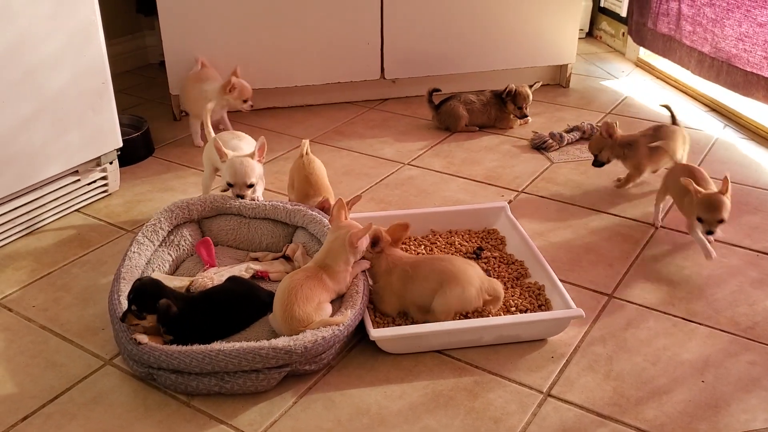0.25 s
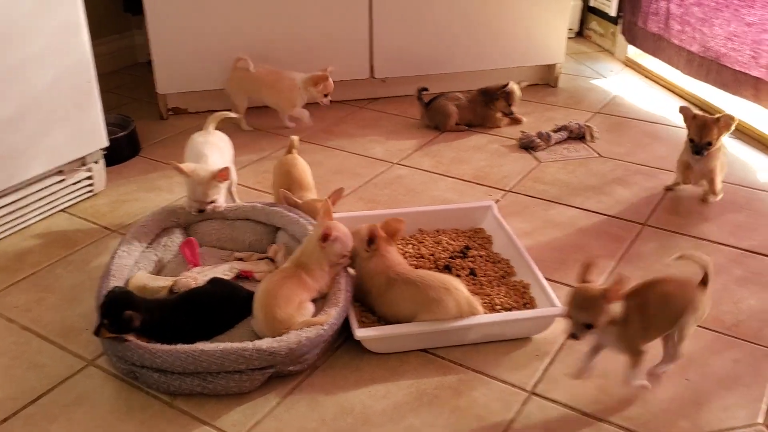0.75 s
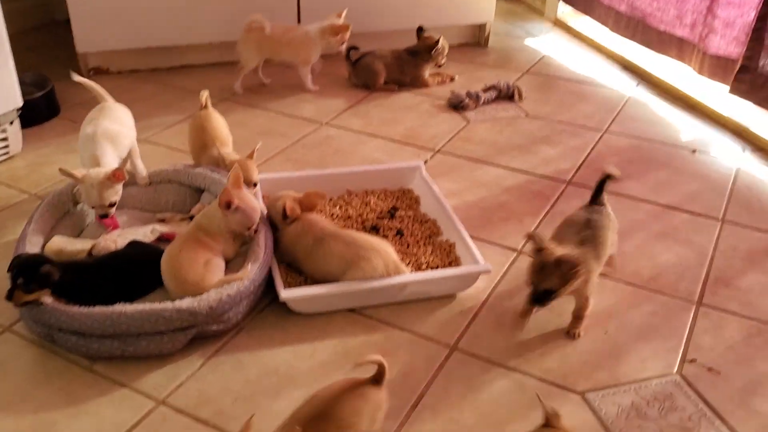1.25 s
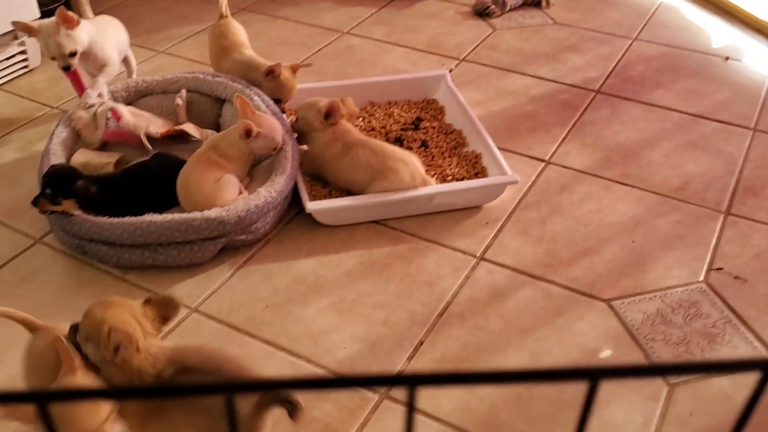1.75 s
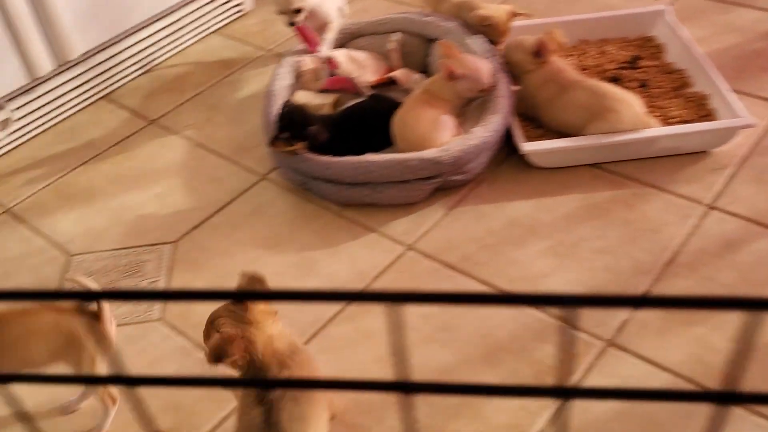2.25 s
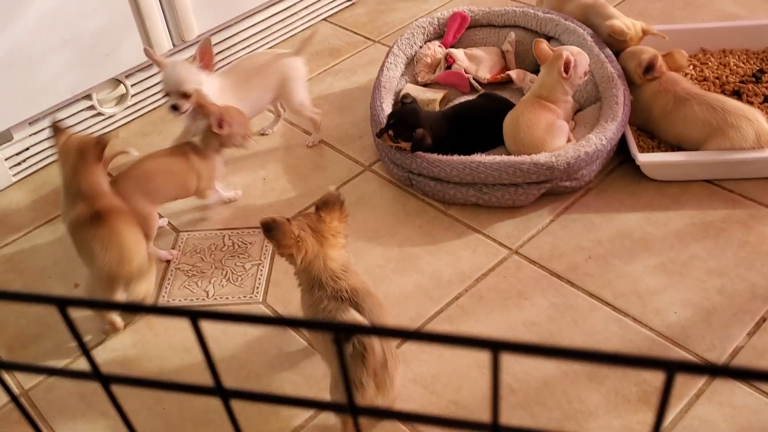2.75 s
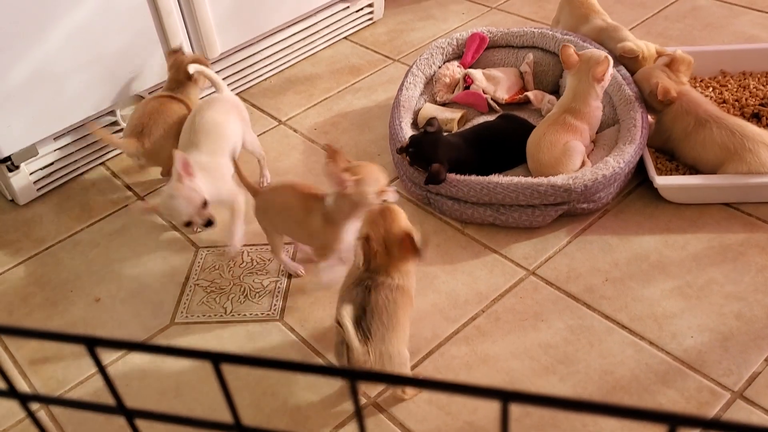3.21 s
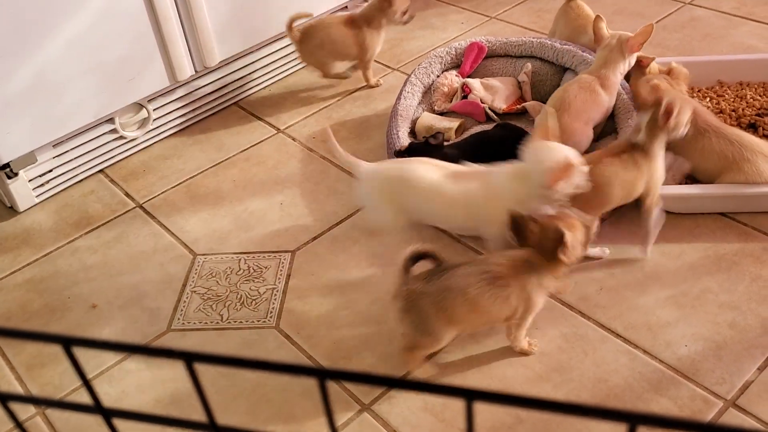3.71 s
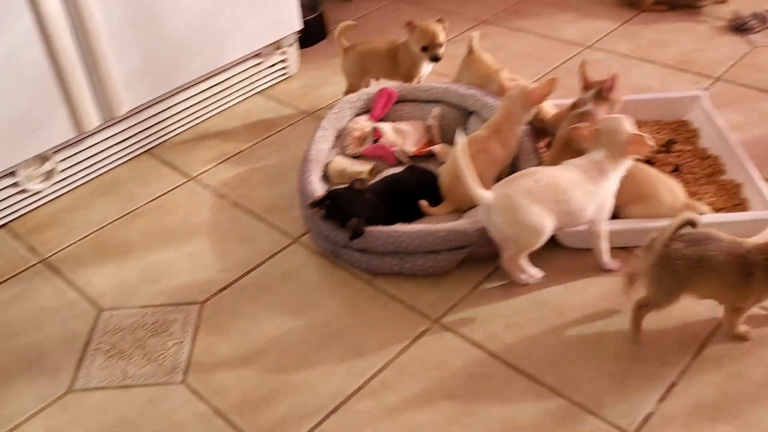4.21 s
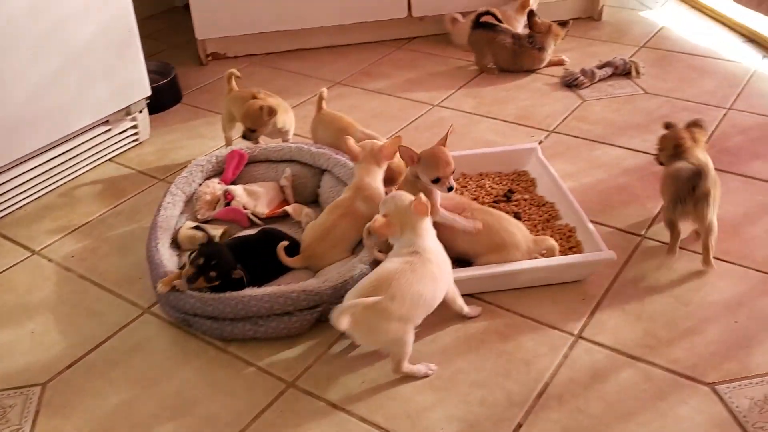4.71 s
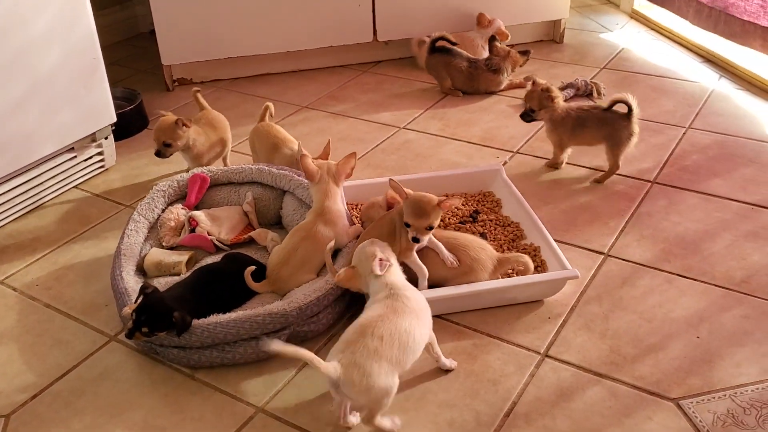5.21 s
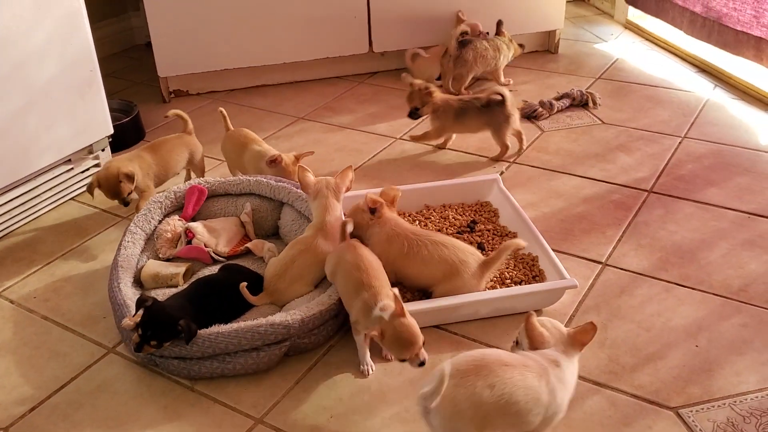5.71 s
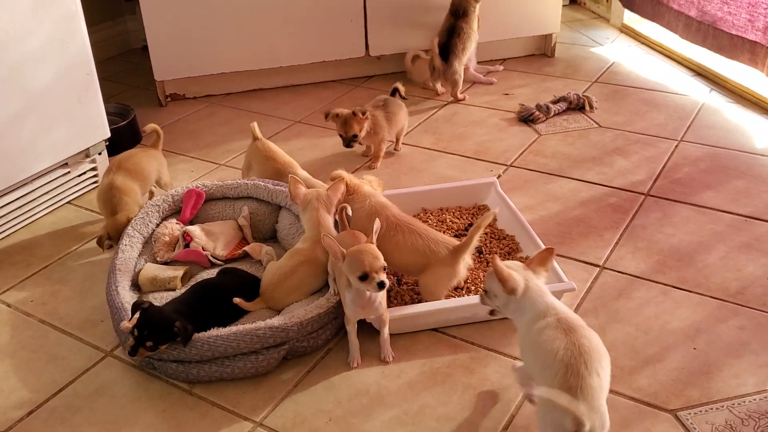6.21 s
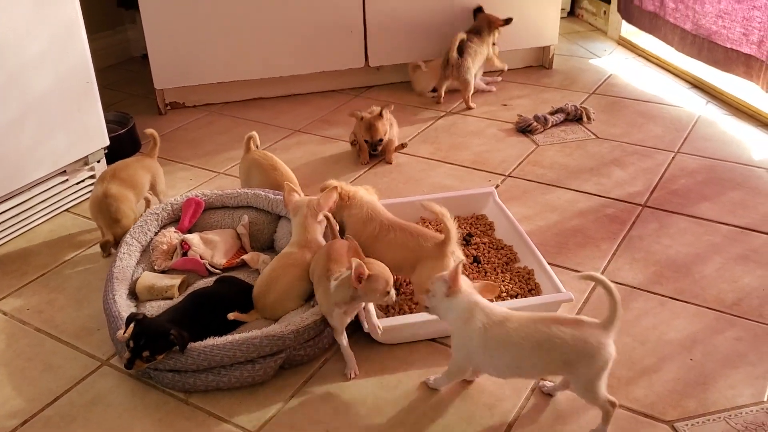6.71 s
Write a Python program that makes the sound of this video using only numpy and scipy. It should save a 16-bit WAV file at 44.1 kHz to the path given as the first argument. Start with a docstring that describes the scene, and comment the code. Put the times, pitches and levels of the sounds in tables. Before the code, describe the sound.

Small puppies romp indoors, their claws clicking and paws scuffing on tile, with soft thuds over a faint refrigerator hum.

```python
"""A tiled kitchen with small puppies romping. Claws tick and skid on the tiles; paws scuff and stir
wood pellets (gritty friction noise), and a pad squeaks once by stick-slip. Knocks ring the modes of a
plastic litter tray, bumped cupboard doors thud at their own low pitches, and soft paws set the floor
booming. Behind it all: a refrigerator's wavering hum and the room's hush."""
import sys
import numpy as np
from scipy import signal
from scipy.fft import rfft, irfft, next_fast_len
from scipy.io import wavfile
from scipy.ndimage import uniform_filter1d

SR = 44100
rng = np.random.default_rng(int(sys.argv[2]) if len(sys.argv) > 2 else 0)


def master_out(mix):
    """Clip the mix to full scale and print it as 16-bit PCM to the path in sys.argv[1]."""
    frames = np.transpose(np.atleast_2d(mix))
    ceiling = np.clip(frames, -1, 1)
    pcm = np.round(ceiling * 32767).astype(np.int16)
    wavfile.write(sys.argv[1], SR, pcm)


N = 306488

# room decay: f/Hz, t60/s
ROOM_T60 = [(300, 0.12), (1300, 0.47), (3500, 0.35), (9000, 0.31), (15000, 0.16)]
# left-right likeness of noise: f/Hz, coherence (clipped to 0..1)
COHERENCE = [(60, 0.94), (180, 0.92), (550, 0.67), (1650, -0.24), (4970, -1.3), (15000, -0.03)]
# microphone response: f/Hz, gain/dB
MIC_RESPONSE = [(6800, -1.5), (8200, -7), (10000, -5), (13000, -5), (15400, -4.5)]
# channel balance: f/Hz, left minus right/dB
MIC_BALANCE = [(60, 0.5), (180, 0.5), (550, -0.5), (1650, 0.5), (4970, 0.5), (15000, 2)]

# noise spectra: f/Hz, relative density/dB
HUSH_SPECTRUM = [(15, -40), (25, -78.5), (58, -1), (90, 3), (226, -1.5), (313, -22), (483, -3.5),
                 (553, -15), (706, -6.5), (1550, -72), (3150, -58), (5570, -22.5), (9330, -45),
                 (15200, -39), (15900, -35), (17000, -22)]  # room
BOOM_SPECTRUM = [(25, 6), (45, 24.5), (70, 35.5), (100, 29.5), (140, -25)]  # floor
FOOT_SPECTRUM = [(80, -7.5), (130, 1.5), (250, 1.5), (420, -5), (700, -40)]  # soft paws
SCRAPE_SPECTRUM = [(710, -49), (1200, 2.5), (1620, 5.5), (1820, 1.5), (2130, 4), (2860, 2.5), (3660, 2.5),
                   (4240, 1.5), (6030, -8.5), (8500, -19), (11000, -58), (18700, -120)]  # paw friction
FIZZ_SPECTRUM = [(5000, 9.5), (6800, 17.5), (9000, 14.5), (12000, 15.5), (14500, 20.5), (15900, 22),
                 (17000, -9)]  # treble of near paws
WEIGHT_SPECTRUM = [(300, -32), (500, -3), (900, 3), (1400, -11), (2200, -26)]  # paws pressing on the floor

# refrigerator lines: f/Hz, width/Hz
HUM_LINES = [(120, 4.5), (213.5, 4.9)]
# their wavering: t/s, lower line level/dB, upper line level/dB
HUM_LEVELS = [(0.0, -60, -59), (0.8, -58.5, -55.5), (1.9, -59, -68.5), (2.2, -52.5, -65),
              (2.65, -51, -50.5), (3.15, -57.5, -62), (3.5, -49, -56.5), (3.85, -59.5, -57.5),
              (5.4, -75, -61.5), (6.3, -60, -58.5), (6.95, -53, -58)]
# tumbles on the floor: t/s, level/dB
TUMBLES = [(0, -41), (2.75, -49), (3.9, -48), (4.55, -55), (5.79, -42), (6.35, -46.5), (6.72, -39)]
# heavier soft steps: t/s, level/dB
STEPS = [(.02, -45), (.11, -42), (.43, -57), (.62, -49), (0.969, -51.5), (1.23, -52.5), (1.45, -47),
         (1.53, -45.5), (2.14, -48.5), (2.27, -50), (2.67, -45), (3.3, -45.5), (3.6, -49), (4.01, -40.5),
         (4.29, -50), (4.38, -53), (4.53, -47.5), (4.67, -54), (5.46, -49.5), (5.54, -45), (5.73, -37.5),
         (5.87, -52.5), (6.6, -48)]
# cupboard bumps: t/s, level/dB, f/Hz, t60/s, rise/ms
DOOR_BUMPS = [(0.087, -51, 166, 0.38, 11), (2.572, -40, 68.4, 0.57, 17), (4.017, -33, 73.2, 0.71, 30),
              (4.522, -42.5, 134, .15, 8), (5.627, -22, 92.2, 0.1, 17), (5.68, -27, 51.6, 0.51, 9.7),
              (5.701, -26, 92, 0.13, 19), (6.303, -34.5, 99, 0.092, 12), (6.352, -37, 50.7, 0.35, 13),
              (6.592, -19, 102.9, 0.19, 6.7), (6.593, -27, 165, 0.13, 3.5),
              (6.592, -43.5, 309.5, 0.21, 8.1), (6.643, -30.5, 52.9, 0.57, 38),
              (6.655, -23.5, 92.5, 0.29, 14)]
# tray modes: f/Hz, relative level/dB, t60/s
TRAY_MODES = [(900, -12, .025), (1075, -3, .05), (1368, 0, .06), (1590, -3, .04), (1800, -5, .03),
              (2090, -6, .04), (2320, -6, .03), (2620, -6, .04), (3060, -6, .03), (3800, -7, .02),
              (4700, -9, .015)]
# tray knocks: t/s, level/dB, contact/ms
TRAY_KNOCKS = [(0.315, -24.5, 10.5), (0.487, -37, 9.8), (3.992, -23.5, 5.5), (4.048, -45, 11),
               (4.36, -31, 3.3), (4.998, -29.5, 11.5), (5.363, -45.5, 7.9), (5.701, -37, 7.6),
               (6.692, -78, 15)]
# pad squeak: peak t/s, level/dB, rise/(dB/s), fade/(dB/s), f/Hz
PAD_SQUEAKS = [(5.25, -47, 700, 450, 2700)]
# distant shuffling: t/s, scrape level/dB, fizz level/dB, weight level/dB
FAR_SHUFFLE = [(0, -89, -66, -66), (.68, -57, -71.5, -65.5), (1.3, -75, -63, -65.5),
               (1.95, -102, -67.5, -67.5), (2.5, -69, -91, -69.5), (3.1, -101, -71, -69),
               (3.7, -99, -69.5, -67), (4.25, -88, -64.5, -66), (4.9, -62, -92, -65), (5.2, -65, -78, -75),
               (5.42, -86, -82, -59), (6.04, -94, -68, -69), (6.5, -96, -120, -67.5), (6.95, -73, -61, -72)]
# scuffs: peak t/s, level/dB, rise/(dB/s), fade/(dB/s), fizz offset/dB, weight offset/dB
PAW_SCUFFS = [(.04, -47.5, 30, 122, -5.5, -0.5), (0.172, -46.5, 102, 117, -14, -1.5),
              (0.328, -34, 900, 143, -22, -16), (.5, -45, 153, 300, -36, -7),
              (0.581, -41, 500, 190, -17, -7.5), (.76, -55.5, 300, 102, -8, -5),
              (.93, -72.5, 200, 120, 12, 12), (1.04, -69.5, 602, 80, 3, 11),
              (1.31, -77, 800, 102, 16.5, -1), (1.47, -59.5, 298, 48, 0, 2), (1.56, -70, 300, 80, 3, -4),
              (1.72, -60, 144, 106, 2, -4), (1.99, -63.5, 700, 80, -6, -11), (2.13, -75, 150, 150, 16, 10),
              (2.202, -55, 2000, 134, -2.5, -2), (2.42, -78.5, 137, 160, 22.5, -17),
              (2.632, -63, 1300, 450, -4, 6), (2.692, -55, 264, 170, -3.5, 0),
              (2.856, -57, 500, 500, 8.5, 4), (2.92, -60.5, 117, 246, 8, -3),
              (3.215, -76, 1500, 133, 16, -2), (3.25, -59, 159, 142, -8, 0.5),
              (3.35, -77, 500, 63, 10.5, -5), (3.545, -78.5, 2000, 47, 16.5, 18),
              (3.85, -62, 246, 159, 8.5, 6), (3.914, -36, 695, 140, -12.5, -10.5),
              (3.993, -45.5, 4000, 900, 20, 0), (4.005, -41, 2000, 196, 2.5, 1.5),
              (4.049, -27, 594, 160, -18, -12), (4.22, -50.5, 67, 92, -30, -10),
              (4.37, -48, 798, 35, -9, -12), (4.51, -48, 78, 79, -17, -7),
              (4.799, -46.5, 600, 202, -20, -10), (5.004, -36.5, 1200, 600, -28, -6),
              (5.048, -45, 450, 193, -7, -11), (5.12, -63.5, 294, 150, 6.5, 5),
              (5.27, -58, 300, 158, 1, -16), (5.5, -45.5, 256, 41, -12.5, -7),
              (5.525, -47, 2000, 180, 1, -15), (5.615, -41.5, 142, 160, -14, -17),
              (5.7, -51, 202, 200, -13, -1), (5.75, -45, 115, 256, -28, -4),
              (5.85, -48.5, 900, 107, -25, -8.5), (6.05, -72.5, 146, 300, 6, 0),
              (6.12, -49.5, 700, 234, -33, -12), (6.22, -58, 500, 28, -25, -15),
              (6.46, -59.5, 380, 208, -3.5, -4), (6.67, -71.5, 1500, 120, 10, 0),
              (6.7, -58.5, 230, 35, -24, -3.5)]
# claw strikes: t/s, level/dB, f/Hz, treble/dB, left minus right/dB (clipped), room send/dB, skid/ms
CLAW_STRIKES = [(0.0483, -37, 3560, -9, 10, 7, 2.2), (0.1411, -44, 3630, -27, -4.0, 6, 2.4),
                (0.406, -33, 3550, -35, -13, -12, 1.8), (0.4585, -40, 4370, -38, -4.5, -12, 2),
                (0.485, -40, 2700, -39, -4, -19, 2.3), (0.5606, -34.5, 6100, -34, 5, -7, 1.5),
                (0.571, -27.5, 4200, -30, -26, 1, 4.2), (1.447, -54, 5530, -16, -1.5, 16, 4),
                (1.625, -44, 6460, -24, 7, -7, 1.9), (1.9654, -35, 6000, -30, 7, -4, 2.8),
                (2.196, -40.5, 3520, -4, -7, 7, 3.5), (2.38, -49, 5470, 0, 5, 12, 2),
                (2.6348, -22, 4200, 4.5, -12, -2.5, 4.5), (2.8325, -43, 4250, -15, -5.5, 5, 2.2),
                (2.8462, -24, 4700, 5.5, -14, 9.5, 1.4), (2.8534, -19.5, 3740, 2, -17, -3, 2.8),
                (3.012, -49, 6300, -30, 6, -8, 1.5), (3.2095, -34, 4300, 1.5, -9, 3, 1.3),
                (3.5406, -31.5, 6260, 15, 9, 2, 2.3), (3.8322, -43.5, 6300, -3.5, -6, 8.5, 2.3),
                (3.8821, -40, 2730, -16, -5, 7, 2), (3.9095, -29, 4100, -29, -15, 11.5, 1.8),
                (3.971, -24, 4100, -29, -9, 8.5, 2.1), (3.9903, -8, 5800, 4, -11, 2.5, 2),
                (4.209, -44, 2500, -42, -9, 8.5, 2), (4.2961, -45, 5800, -12, -10, 2, 2),
                (4.357, -16.5, 3230, -14, -4.5, -11, 2.3), (4.628, -49, 2550, -27, -3.0, -5, 2.2),
                (4.7008, -58.5, 3960, -29, 11, -7, 2), (4.778, -35, 4140, -28.5, -7, -0.5, 2),
                (4.788, -33, 3900, -37, -20, 2, 4.6), (4.9815, -37, 3550, -32, -4.0, 5, 1.8),
                (4.9974, -32, 2420, -28, 2, 6, 1.1), (5.0434, -31, 5470, -35, -14, -3, 2),
                (5.228, -48, 5600, -18, -5, 12, 2.2), (5.2413, -46.5, 5000, -26, -7, 3, 3),
                (5.4939, -51, 3670, -21, -3.0, 2, 2), (5.5212, -29, 3740, -3, -9, 8.5, 2),
                (5.6056, -22, 3970, -43, -16, -0.5, 2), (5.738, -31, 3830, -29, -11, -1.5, 10),
                (5.79, -41, 3970, -27, -4.5, -6, 2), (5.8393, -32, 3560, -35, -5.0, 2.5, 3.9),
                (5.9867, -40.5, 5370, -29, -17, -8, 3.2), (6.111, -40, 3880, -28, -9, -11, 2),
                (6.2084, -39.5, 4700, -29, -11, 1, 2.3), (6.2172, -34.5, 3920, -43, -24, -0.5, 3.4),
                (6.2796, -52, 3220, -34, 2, 12, 2), (6.3754, -50, 6100, -7, -3.0, 15, 2.3),
                (6.384, -34.5, 5570, -4, -1, -9, 3.2), (6.452, -42.5, 3980, -22, -5.5, 5, 2.2),
                (6.4689, -34, 3670, -30, -17, -2.5, 0.92), (6.5316, -48, 4320, -27, 4, 1, 2),
                (6.6613, -41.5, 4070, -6, -12, 6, 4.5)]


def gain_of(db):
    return 10 ** (np.asarray(db) / 20)


def unit_rms(x):
    return x / np.sqrt(np.mean(x ** 2) + 1e-20)


def at_hz(points, hz):
    """Table value, interpolated over log frequency."""
    f, value = np.transpose(points)
    return np.interp(np.log(hz + 1), np.log(f + 1), value)


def curves(rows):
    """Columns of a time table at every sample."""
    times_s, *columns = np.transpose(rows)
    return [np.interp(np.arange(N) / SR, times_s, column) for column in columns]


def add(mix, start_s, sound):
    part = mix[..., round(start_s * SR):][..., :sound.shape[-1]]
    part += sound[..., :part.shape[-1]]


def swells(peak_s, db, rise_db_s, fade_db_s, floor_db):
    """Envelope of peaks with straight dB slopes, power-summed over a floor."""
    t = np.arange(0, N / SR + .01, .002)
    since_s = t - np.reshape(peak_s, (-1, 1))
    slope = np.where(since_s < 0, np.reshape(rise_db_s, (-1, 1)), -np.reshape(fade_db_s, (-1, 1)))
    power = (gain_of(np.reshape(db, (-1, 1)) + slope * since_s) ** 2).sum(0)
    return np.sqrt(np.interp(np.arange(N) / SR, t, power) + gain_of(floor_db) ** 2)


def resonate(x, hz, width_hz, order=1):
    """Unity-gain resonance, applied order times: shift to 0 Hz, smooth, shift back."""
    carrier = np.exp(2j * np.pi * np.cumsum(np.full(len(x), hz)) / SR)
    pole = np.exp(-np.pi * width_hz / SR)
    for _ in range(order):
        x = 2 * (carrier * signal.lfilter([1 - pole], [1, -pole], x / carrier + 1e-18)).real
    return x


def noise(spectrum, fft_size, patchy_db=0):
    """Unit-RMS stereo noise; patchy_db adds drifting patches to its spectrum."""
    hop = fft_size // 4
    hz = np.fft.rfftfreq(fft_size, 1 / SR)
    left_re, left_im, other_re, other_im, patches = rng.standard_normal((N // hop + 5, len(hz), 5)).T
    patches = uniform_filter1d(patches, size=len(hz) // 40, axis=0)
    patches = unit_rms(uniform_filter1d(patches, size=2048 // hop, axis=1))
    coherence = np.clip(at_hz(COHERENCE, hz), 0, 1)[:, None]
    left = left_re + 1j * left_im
    right = coherence * left + np.sqrt(1 - coherence ** 2) * (other_re + 1j * other_im)
    bins = np.array([left, right]) * gain_of(at_hz(spectrum, hz)[:, None] + patchy_db * patches)
    return unit_rms(signal.istft(bins, nperseg=fft_size, noverlap=fft_size - hop)[1][:, :N])


def reverb(x):
    """Reflections off tiles and cupboards: sparse random-sign taps, each band with its own decay."""
    taps = np.zeros((2, SR // 2))
    grid = np.arange(90, SR // 2 - 12, 12)
    delays = grid + rng.integers(0, 12, (2, len(grid)))
    np.put_along_axis(taps, delays, rng.choice([-1., 1.], delays.shape), 1)
    hz, t, bins = signal.stft(taps, SR, nperseg=256)
    decay = gain_of(-60 * t / at_hz(ROOM_T60, hz)[:, None])
    tail = signal.istft(bins * decay, SR, nperseg=256)[1]
    return signal.fftconvolve(x[None], tail / np.linalg.norm(tail[0]), axes=1)[:, :N]


def room_hush():
    """Steady, mostly low noise."""
    return gain_of(-56.5) * noise(HUSH_SPECTRUM, fft_size=2048)


def refrigerator():
    """Two wavering hum lines, each a sine plus narrow noise, and a thin whine."""
    t = np.arange(N) / SR
    hum = np.zeros(N)
    for (hz, width_hz), db in zip(HUM_LINES, curves(HUM_LEVELS)):
        fuzz = unit_rms(resonate(rng.standard_normal(N), hz, width_hz))
        hum += gain_of(db) * unit_rms(0.79 * np.sin(2 * np.pi * hz * t) + fuzz)
    whine = unit_rms(resonate(rng.standard_normal(N), hz=5570, width_hz=60))
    return hum + gain_of(-85) * whine


def paw_padding():
    """Tumbles boom through the floor and soft paws patter: swells of low noise."""
    boom = swells(*np.transpose(TUMBLES), rise_db_s=140, fade_db_s=70, floor_db=-53.5)
    feet = swells(*np.transpose(STEPS), rise_db_s=150, fade_db_s=236, floor_db=-54.5)
    return boom * noise(BOOM_SPECTRUM, fft_size=4096) + feet * noise(FOOT_SPECTRUM, fft_size=2048)


def cupboard_thuds():
    """A bumped door panel swings up and dies away at its own low pitch."""
    out, t = np.zeros(N), np.arange(SR // 2) / SR
    for start_s, db, hz, t60_s, rise_ms in DOOR_BUMPS:
        swing = (1 - np.exp(-(t * 1000 / rise_ms) ** 2)) * gain_of(-60 * t / t60_s)
        add(out, start_s, gain_of(db) * swing / swing.max() * np.sin(2 * np.pi * hz * t))
    return out


def tray_knocks():
    """A short rattling contact rings the plastic tray's modes."""
    out, t = np.zeros(N), np.arange(6000) / SR
    ring = sum(gain_of(db - 60 * t / t60_s) * np.sin(2 * np.pi * hz * t) for hz, db, t60_s in TRAY_MODES)
    for time_s, db, contact_ms in TRAY_KNOCKS:
        progress = t[:1200] * 1000 / contact_ms
        rattle = rng.standard_normal(len(progress)) * progress * np.exp(-2 * progress)
        knock = signal.fftconvolve(rattle, ring)
        add(out, time_s - .004, gain_of(db) * knock / abs(knock).max())
    return np.array([gain_of(-5) * out, out]) + gain_of(-7) * reverb(out)


def pad_squeak():
    """A pad sticks and slips on tile: one rough, narrow tone."""
    peak_s, db, rise_db_s, fade_db_s, hz = PAD_SQUEAKS[0]
    fuzz = unit_rms(resonate(rng.standard_normal(N), hz, width_hz=200, order=2))
    tone = unit_rms(np.sin(2 * np.pi * hz * np.arange(N) / SR) + 0.73 * fuzz)
    tone *= swells(peak_s, db, rise_db_s, fade_db_s, floor_db=-200)
    return np.array([gain_of(-1) * tone, tone]) + gain_of(-4) * reverb(tone)


def paw_scuffs(grains_per_s=160, grain_s=0.002):
    """Friction hiss roughened by pellet grains, over the duller noise of weight on the floor."""
    peak_s, db, rise, fade, fizz_db, weight_db = np.transpose(PAW_SCUFFS)
    far_scrape_db, far_fizz_db, far_weight_db = curves(FAR_SHUFFLE)
    grains = gain_of(3 * np.minimum(rng.exponential(1, N), 3)) * (rng.random(N) < grains_per_s / SR)
    grains = signal.lfilter([1], [1, -np.exp(-1 / (grain_s * SR))], grains)
    grit = unit_rms(1 + 0.45 * grains)
    fizz = noise(FIZZ_SPECTRUM, fft_size=256, patchy_db=1.2)
    fizz *= swells(peak_s, db + fizz_db, rise, fade, far_fizz_db)
    scrape = noise(SCRAPE_SPECTRUM, fft_size=256, patchy_db=3.5)
    scrape *= swells(peak_s, db, rise, fade, far_scrape_db)
    weight = noise(WEIGHT_SPECTRUM, fft_size=512, patchy_db=1.2)
    weight *= swells(peak_s, db + weight_db, rise, fade, far_weight_db)
    hiss = scrape + gain_of([[-3], [3]]) * fizz
    return grit * hiss * gain_of([[-1.5], [1.5]]) + weight


def light_strikes(rate_per_s=9.3):
    """Lighter claw strikes at random times, as rows like CLAW_STRIKES."""
    draws = rng.random((round(rate_per_s * N / SR), 4))
    return [(when * N / SR, -52 + 6 * np.log(force + .1), 3500 + 3300 * pitch, -14 + 14 * near, -4, 3, 2)
            for when, force, pitch, near in draws]


def claw_ticks(near_treble_db=-19, near_lag_samples=7):
    """A claw tip strikes tile, rings a few cycles and skids; near ones are bright and lag on the left."""
    direct, sends = np.zeros((2, N)), np.zeros((3, N))
    t = np.arange(900) / SR
    highpass = signal.butter(2, 10500, "high", fs=SR, output="sos")
    bandpass = signal.butter(3, [2400, 7400], "band", fs=SR, output="sos")
    strikes = list(CLAW_STRIKES) + light_strikes()
    for k, (start_s, db, hz, treble_db, pan_db, room_db, skid_ms) in enumerate(strikes):
        skids = .12 * rng.standard_normal((2, len(t))) * np.exp(-t * 1000 / skid_ms)
        mid_drive, treble_drive = (t == 0) + skids
        ring = unit_rms(resonate(mid_drive, hz, width_hz=1500, order=2))
        edge = unit_rms(signal.sosfilt(bandpass, mid_drive))
        treble = gain_of(treble_db) * unit_rms(signal.sosfilt(highpass, treble_drive))
        body = unit_rms(ring + 0.12 * edge)
        gain = gain_of(db) / abs(body + treble).max()
        lag_s = near_lag_samples / SR * (treble_db > near_treble_db)
        left_share = 1 / (1 + gain_of(-np.clip(pan_db, -9, 5)))
        add(direct[0], start_s + lag_s, 2 * left_share * gain * (body + gain_of(-12) * treble))
        add(direct[1], start_s, 2 * (1 - left_share) * gain * (body + treble))
        # walls get the tick from all sides: less marked pitch
        diffuse = unit_rms(1.4 * ring + edge) + treble
        add(sends[k % 3], start_s, gain * gain_of(room_db) * diffuse)
    return direct + gain_of([[-2.5], [1.5]]) * sum(reverb(send) for send in sends)


def scene():
    puppies = claw_ticks() + tray_knocks() + cupboard_thuds() + pad_squeak() + paw_scuffs() + paw_padding()
    return puppies + refrigerator() + room_hush()


def record(dry, low_cut_hz=38, band_limit_hz=15950):
    """Bass roll-off, microphone response and balance, band limit."""
    dry = signal.sosfilt(signal.butter(3, low_cut_hz, "high", fs=SR, output="sos"), dry)
    fft_size = next_fast_len(N + 4096)
    hz = np.fft.rfftfreq(fft_size, 1 / SR)
    lean_db = at_hz(MIC_BALANCE, hz) / 2
    response = gain_of(at_hz(MIC_RESPONSE, hz) + [lean_db, -lean_db])
    coloured = irfft(rfft(dry, fft_size) * response, fft_size)[:, :N]
    lowpass = signal.firwin(511, band_limit_hz, window=("kaiser", 9), fs=SR)
    return signal.oaconvolve(coloured, lowpass[None], "same")


dry = scene()
out = record(dry)
master_out(out)
```